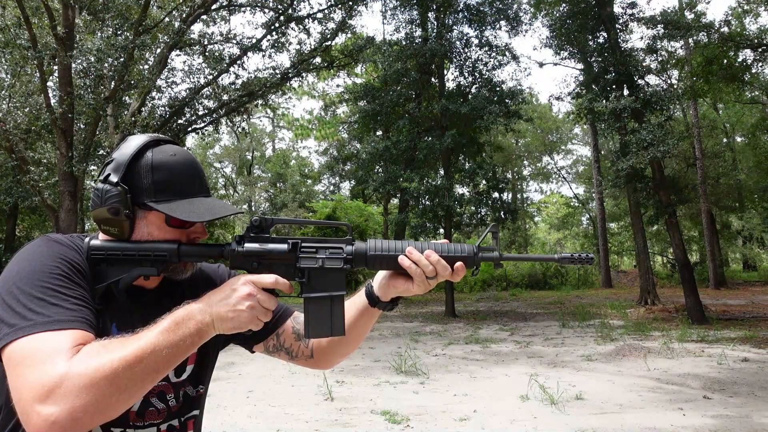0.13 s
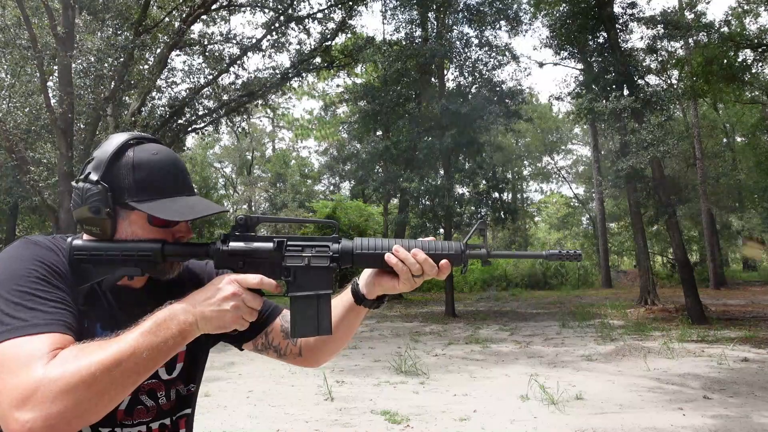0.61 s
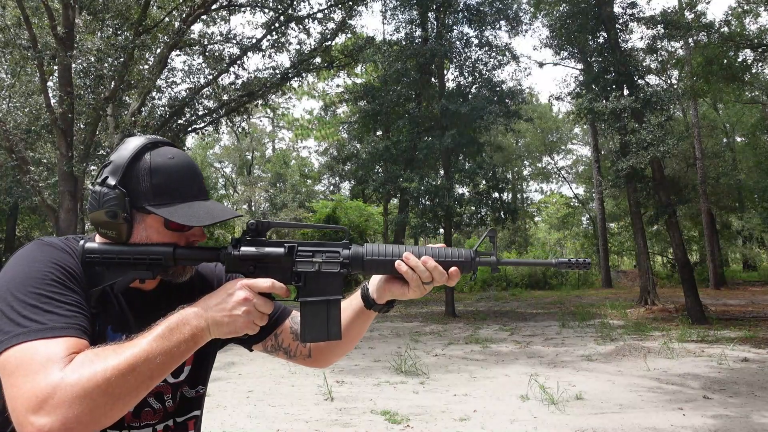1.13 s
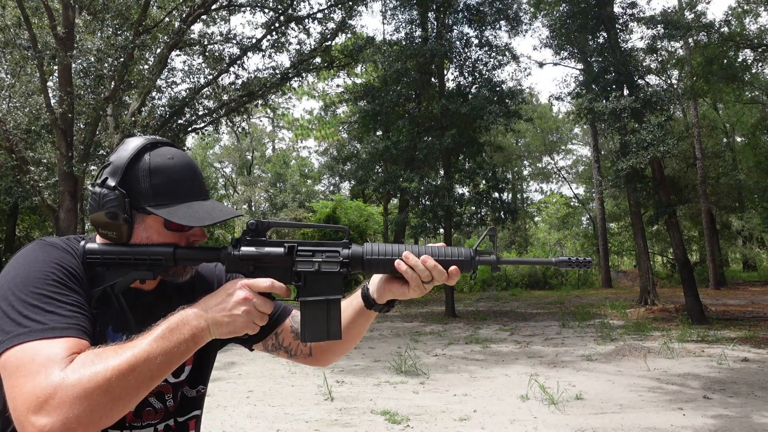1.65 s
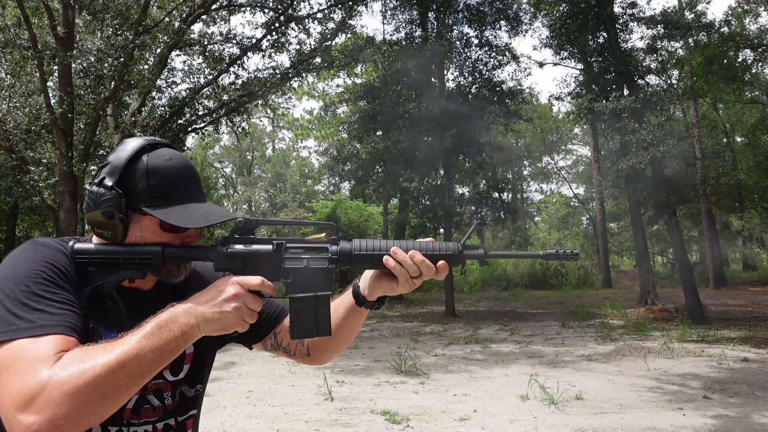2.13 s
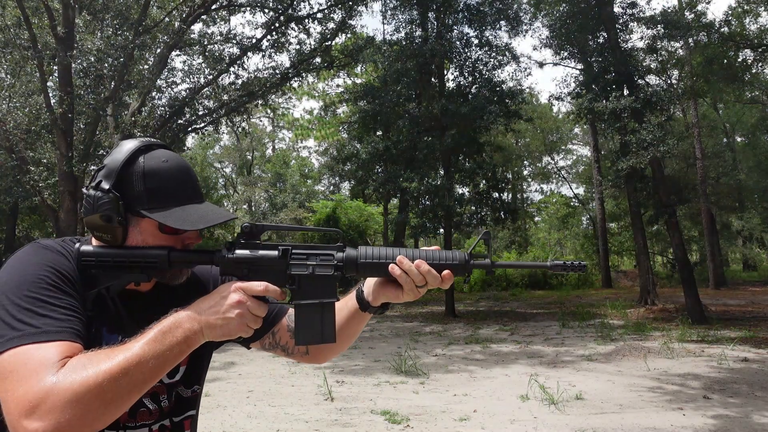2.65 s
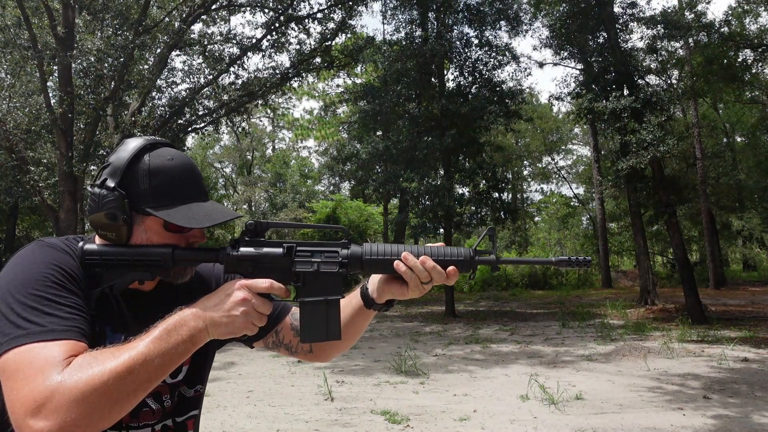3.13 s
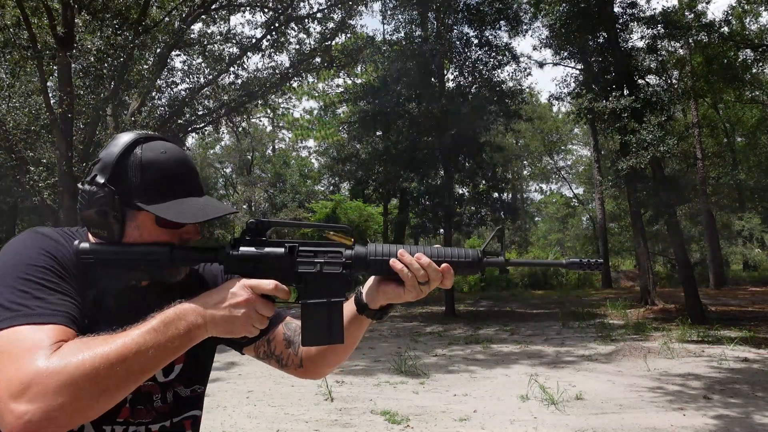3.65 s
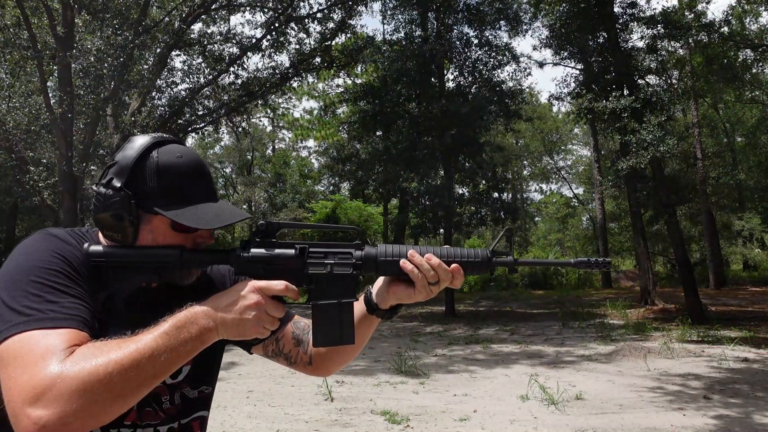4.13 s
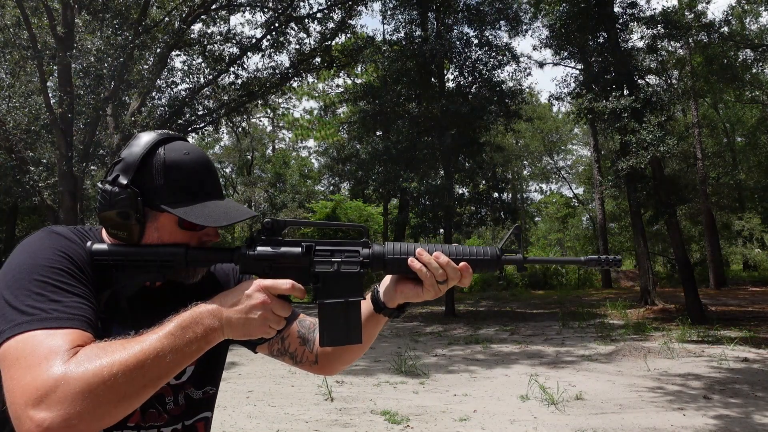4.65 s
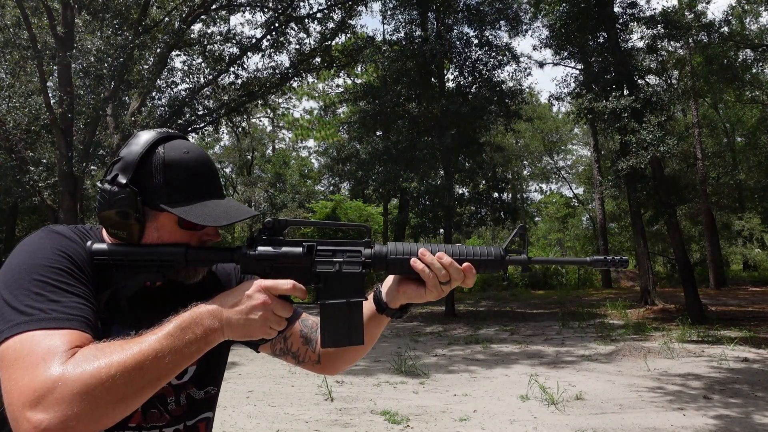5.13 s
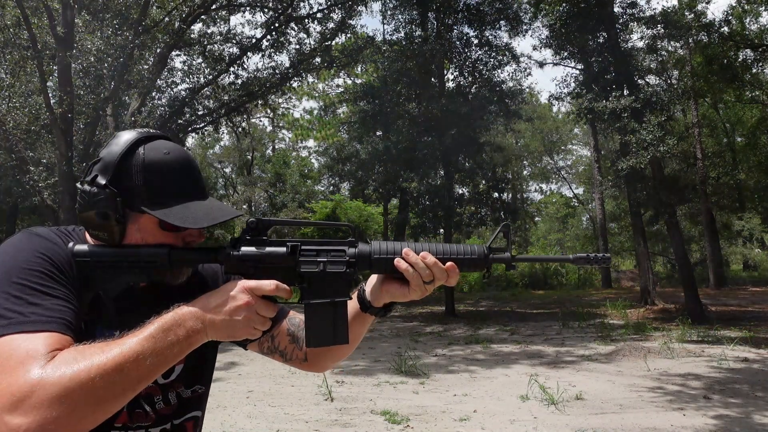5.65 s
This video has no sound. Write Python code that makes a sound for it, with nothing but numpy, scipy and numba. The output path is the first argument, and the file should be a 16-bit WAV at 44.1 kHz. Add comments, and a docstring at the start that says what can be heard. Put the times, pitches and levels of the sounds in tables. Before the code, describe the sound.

A quiet wooded clearing opens with soft air and a thin, high cicada hiss, its lower band sinking at the start. At about 0.4 s a close rifle fires: a tiny mechanical click, then a hard, overloaded crack and thump with quick slaps from nearby trunks. Under a tenth of a second later a steel plate clangs, bright and inharmonic, wavering as it swings. A dense forest roar, held level by limiting, loses treble and fades. A second shot and clang follow at 2.1 s. At 3.4 s the tail and most of the insects cut off abruptly; the third shot hits at 3.5 s. Around 4.24 s a spent case makes a very faint, high double tick. From 4.5 s a nearer cicada's rapid, even buzz swells as the chorus returns. The fourth shot lands at 5.4 s, its ring and roar still sounding at the end, near 5.8 s.

```python
"""In a wood clearing, a rifle fires four times close to a microphone; each bullet rings a steel plate.
Short noise bursts make the blast, and dying noise makes the long roar from the trees, treble fading first.
Dying sine waves make the plate; throbbing noise and a click train make the cicadas, over soft air noise.
A limiter holds the roar at one level until it has died down enough."""
import sys
import numpy as np
from scipy import signal
from scipy.io import wavfile
from scipy.ndimage import uniform_filter1d
from numba import njit

SR = 44100
rng = np.random.default_rng(int(sys.argv[2]) if len(sys.argv) > 2 else 0)


def boost(x):
    """Linear amplitude factor 10**(x/20) for a level x in decibels (scalar or array-like)."""
    u = np.asarray(x, float) / 20
    return 10 ** u


def digitize_waveform(pressure):
    """Quantize a signal to 16-bit integers and store it at the path in sys.argv[1].

    Rows of a 2-D input are taken as channels; values are limited to [-1, 1].
    """
    field = np.atleast_2d(pressure).T
    bounded = np.clip(field, -1, 1)
    quanta = np.round(bounded * 32767).astype(np.int16)
    wavfile.write(sys.argv[1], SR, quanta)


N = 254898  # length in samples

# The four shots. Each row: muzzle blast in seconds, level of the blast in dB, level of the echoes in dB.
SHOTS = [(.4265, 9.5, 0.24), (2.137, 9.5, -0.5), (3.517, 10, -0.5), (5.392, 8, -1)]
# The sound of earlier shots breaks off at this time.
CUT_S = 3.4095
# One shot as noise bursts, in row order: hammer, bullet start, gas crack, muzzle blast, its low body, ground
# echo, echo off the shooter and nearest ground, deep thud, low push, deep thud thrown back, two low slaps from
# the near trunks, sharp edge of that slap, the bullet bursting on the plate, a last low slap. Each row: start
# in ms from the blast, level in dB before the shot's own, time to die to 1/e in ms, centre in Hz, width in Hz.
BURSTS = [(-15, -37, 3.9, 1400, 9000), (-4.5, -21, 0.99, 5000, 8000), (-4, -12, 2, 5100, 12000),
          (0.44, 22, 2, 6100, 11600), (1.5, 12.5, 12, 760, 1560), (5, 18, 5.2, 3500, 19000),
          (7.5, 8, 3.7, 1200, 3500), (-5.5, -15, 7.2, 28, 43), (14, 16, 1.4, 157, 740),
          (54, -12, 21, 39, 56), (58, 7.5, 4.4, 490, 540), (65, 9.5, 9.9, 490, 480),
          (65.5, 12, 1.8, 2500, 2600), (74, 7, 0.97, 2100, 9900), (92, 5, 16.5, 630, 1700)]
# Echoes from the trees. Each row: pitch in Hz, starting level in dB before WOOD_DB, time to fall 60 dB in s.
WOOD_ECHOES = [(25, -112, 1), (60, -35, 6.9), (120, -5.5, 3.24), (271, 5.5, 1.96), (690, 8.5, 2.57),
               (1310, 3.5, 2.54), (2730, 1.5, 2.014), (4860, 2, 1.513), (7760, 3.5, 1.196),
               (10600, -3.5, 0.98), (14200, -1.5, 0.62), (16200, -16, 0.17)]
WOOD_DB, WOOD_RISE_S = 13, 0.014
# Rumble from the far forest. Each row: pitch in Hz, starting level in dB before FAR_DB, time to fall 60 dB in s.
FAR_RUMBLE = [(30, -33, 5.8), (120, -5.5, 5), (493, 4.5, 5.75), (1190, -0.5, 5.7), (2680, -8, 4.12),
              (8300, -50, 6.9)]
FAR_DB, FAR_RISE_S = 2.5, 0.46
# Ways the steel plate vibrates (modes). Each entry: pitch in Hz.
PLATE_HZ = [228, 668, 932, 1459, 1787, 1846, 2734, 2852, 3382, 3838, 4420, 4741, 4904, 5436, 5512, 6013,
            6481, 6740, 6880, 7407, 7590, 7917, 8196, 8457, 8710, 8952, 9400, 9593, 10930, 11838]
# The same modes in order. Each row: time to fall 60 dB in seconds, level in dB when struck on a belly
# (before PLATE_DB), place of the first hit between two bellies from 0 to 1, direction of its waves in degrees.
PLATE_MODES = [(5.45, -11, 0.7, 155), (2.2, 3, 0.27, -14), (2.38, -6.5, 0.36, 114), (1.92, -0.5, 0.53, 58),
               (2.17, 0.5, 0.38, 122), (2.5, -5, 0.74, 142), (2.1, -5, 0.05, -1), (2.1, -4.5, 0.39, 0),
               (1.91, 2.5, 0.7, 0), (1.76, -4, 0.27, 67), (1.62, -1, 0.12, 93), (1.36, -1, 0.88, 30),
               (1.58, -3, 0.51, 90), (1.5, 4, 0.42, 154), (1.53, 0, 0.51, 60), (1.4, -3, 0.9, 116),
               (1.42, -2, 0.72, 27), (1.33, 4, 0.45, 152.5), (0.96, -3, 0.97, 0), (0.4, -12.5, 0.09, 30),
               (1.1, -4, 0.97, 82), (1.21, 1.5, 0.2, 38), (1.15, 0, 0.6, 33), (1.26, -1.5, 0, 76),
               (1, -8, 0.05, 78), (1.14, -3, 0.47, 62), (1.18, 1, 0.72, 154.5), (0.62, -2, 0.39, 60),
               (1.03, -7.5, 0.66, 61), (0.94, -5.5, 0.07, 91)]
PLATE_DB = -0.5
BEND_CM = 30  # length of a bending wave in the steel at 1 kHz
# One hit for each shot. Each row: flight to the plate and sound back in seconds, cm right of the first hit's
# reference point, cm up from it, pace of the swing (1 = usual).
HITS = [(.08, 0.5, 0, 0.96), (.077, 9, 6.5, 1.02), (.075, 6.5, -3, 1.15), (.077, 5, -2, 0.97)]
# The swinging plate turns each louder mode's beam past the microphone. Each key is a mode in Hz; its row:
# seconds after the hit, lift in dB, half width in seconds (both times at the usual pace).
BEAMS = {"228": (0.98, 6.3, 0.38), "668": (0.3, 7.5, 0.27), "932": (0.69, 8.2, 0.29),
         "1459": (.3, 6.7, 0.51), "1787": (0.049, 11.5, 0.081), "1846": (0.11, 9.9, 0.085),
         "2734": (0.05, 8.8, 0.037), "2852": (.1, 7, 0.071), "3382": (0.095, 8, 0.17),
         "4420": (0.35, 9.4, 0.058), "4741": (.09, 5.7, .1), "5436": (0.37, 9, 0.18), "6481": (.2, 4.3, .1),
         "6740": (0.46, 7.2, 0.15), "7917": (0.26, 5.5, .1), "8196": (0.21, 8.9, 0.04),
         "9400": (0.34, 2.5, 0.096)}
SWING_S, SWING_KEEPS = 0.564, 0.15  # the beam returns after each swing, with this share of its dB
# The plate's crowd of weak upper modes. Each row: pitch in Hz, usual level in dB, time to fall 60 dB in seconds.
SHIMMER = [(5800, -8, 1.06), (8900, -13.5, 1.2), (11700, -18.5, 1.01), (15700, -19, 0.65)]
# A spent case lands and bounces. Each row: start in seconds, starting level in dB.
CASE_TICKS = [(4.2412, -24), (4.2442, -31)]
# The cicada chorus. Each row: time in seconds, low band in dB, high band in dB, centre of the high band in Hz.
CICADAS = [(0, -33, -34.5, 10100), (.12, -41.5, -37.5, 9700), (.4, -41.5, -37.5, 9450),
           (1.3, -49, -38, 9700), (1.64, -47, -40.5, 9700), (1.72, -42.5, -37, 9950),
           (2.1, -38.5, -33.5, 9960), (3.409, -41.5, -35, 9800), (3.41, -62, -77, 9600),
           (3.5, -51, -64, 9600), (4.5, -50, -45, 9500), (4.999, -44, -42.5, 9650), (5.78, -37, -46, 9600)]
# Three strips side by side make the high band broad and flat-topped. Each entry: shift from its centre in Hz.
SPREAD_HZ = [-560, 0, 560]
LOW_HZ, TOP_HZ, TOP_DB = 5120, 13700, -14.5  # the faint top band follows the high one's level
SINK_HZ, SINK_S = 400, 0.052  # the low band starts this much higher and sinks to its pitch
# One near cicada. Each row: time in seconds, clicks per second, level in dB before its body colours it.
SINGER = [(4.5, 170.4, -54), (4.65, 170.1, -50), (4.8, 169.3, -47), (4.95, 168.9, -45), (5.1, 168.9, -43),
          (5.25, 168.8, -43), (5.4, 168.9, -44)]
# How its body colours the clicks. Each row: pitch in Hz, gain in dB.
SINGER_BODY = [(4500, -6.5), (4900, -16), (5066, 4.5), (5250, -19), (5450, -11), (6100, -7.5), (6700, -15),
               (8000, -29), (9000, -14), (10480, -4.5), (10650, -29), (13300, -30), (14000, -18),
               (15000, -24)]
# Colour of the still air. Each row: pitch in Hz, relative level in dB.
AIR_COLOUR = [(25, -39), (60, 11), (150, 3.5), (400, 2.5), (1000, -3), (2500, -18.5), (7000, -21),
              (12000, -25), (17000, -22)]
# Loudness of the still air. Each row: time in seconds, level in dB.
AIR_LEVEL = [(0, -42.5), (3.409, -40), (3.41, -40.5), (5.78, -40)]


def evened(x):
    """Scales a sound so that its average power is 1."""
    return x / np.sqrt(np.mean(x ** 2) + 1e-20)


def add(mix, s, sound):
    """Mixes a sound in at s seconds."""
    part = mix[round(s * SR):][:len(sound)]
    part += sound[:len(part)]


def resonate(x, hz, width):
    """Keeps what lies near hz: shifts it down to zero, smooths it twice, and shifts it back."""
    turn = np.exp(2j * np.pi * np.cumsum(hz * np.ones(len(x))) / SR)
    r = np.exp(-np.pi * width / SR)
    low = signal.lfilter([(1 - r) ** 2], [1, -2 * r, r * r], x / turn)
    return 2 * (turn * low).real


def shape(x, table):
    """Colours x by rows (Hz, dB, seconds to fall 60 dB), each band dying at its own speed."""
    hz, t, z = signal.stft(x, SR, nperseg=1024, noverlap=768)
    row_hz, db, t60 = np.transpose(table)
    db, t60 = (np.interp(np.log(hz + 1), np.log(row_hz), column)[:, None] for column in (db, t60))
    z = z * boost(db - 60 * t / np.maximum(t60, .1))
    return signal.istft(z, SR, nperseg=1024, noverlap=768)[1][:len(x)]


def blast():
    """Hammer, crack, muzzle blast and first slaps as dying noise, starting 20 ms ahead of the blast."""
    out, t = np.zeros(SR // 5), np.arange(SR // 10) / SR
    for ms, db, decay_ms, hz, width in BURSTS:
        noise = evened(resonate(rng.standard_normal(len(t)), hz, width))
        envelope = np.exp(-1000 * t / decay_ms) * np.minimum(t / 0.00017, 1)
        add(out, (ms + 20) / 1000, boost(db) * noise * envelope)
    return out


def echoes(t):
    """Single trunks send sharp echoes back over a dense bed; the far forest answers late and dull."""
    # about 1200 single echoes a second, of chance strength
    strength_db = 2.7 * np.minimum(rng.exponential(1, len(t)), 5)
    trunks = (rng.random(len(t)) < 1200 / SR) * boost(strength_db)
    near = evened(.5 * evened(trunks - trunks.mean()) + rng.standard_normal(len(t)))
    # trees stand in groups, so the level drifts
    drift = uniform_filter1d(uniform_filter1d(rng.standard_normal(len(t)), 1500), 1500)
    stands_db = 1.5 * evened(drift)
    near = boost(WOOD_DB + stands_db) * shape(-near, WOOD_ECHOES) * (1 - np.exp(-t / WOOD_RISE_S))
    far = shape(rng.standard_normal(len(t)), FAR_RUMBLE) * (1 - np.exp(-t / FAR_RISE_S))
    return near + boost(FAR_DB) * far


def plate(t, right_cm, up_cm, pace):
    """Dying modes, strong if hit on a belly; they swell with the swing and waver as their echoes interfere."""
    out, slow = np.zeros(len(t)), t[::64]  # levels change slowly, so a coarse clock is enough
    for hz, (t60, db, place, deg) in zip(PLATE_HZ, PLATE_MODES):
        rate, phase = rng.uniform(2.48, 14.5, (4, 1)), 2 * np.pi * rng.random((5, 1))
        off_cm = right_cm * np.cos(np.radians(deg)) + up_cm * np.sin(np.radians(deg))
        # waves get shorter by the root of the pitch
        off_turn = 2 * np.pi * off_cm / BEND_CM * np.sqrt(hz / 1000)
        struck = np.hypot(np.cos(np.pi * place + off_turn), .1)
        waver_db = min(hz / 1500, 1.6) * np.sin(2 * np.pi * rate * slow + phase[:4]).sum(0)
        beam_s, lift_db, width_s = BEAMS.get(str(hz), (0, 0, 1))
        beam_db = sum(lift_db * SWING_KEEPS ** k
                      * np.exp(-((pace * slow - beam_s - k * SWING_S) / width_s) ** 4) for k in range(3))
        level = struck * boost(db - 60 * slow / t60 + waver_db + beam_db)
        out += np.interp(t, slow, level) * np.sin(2 * np.pi * hz * t + phase[4])
    return boost(PLATE_DB) * out * (1 - np.exp(-t / .008))


def shimmer(t):
    """Many thin plate modes of chance pitch and strength, each flickering as its echoes interfere."""
    row_hz, db, t60 = np.transpose(SHIMMER)
    slow, out = t[::64], np.zeros(len(t))
    for place, size, *chance in rng.random((70, 9)):
        hz = 5800 + place * 9900
        rate = 2.2 + 8 * np.array(chance[:3])[:, None]
        phase = 2 * np.pi * np.array(chance[3:])[:, None]
        flicker_db = 3.1 * np.sin(2 * np.pi * rate * slow + phase[:3]).sum(0)
        start_db = np.interp(hz, row_hz, db) + 9 * (size - .5)
        level_db = start_db - 60 * slow / np.interp(hz, row_hz, t60) + flicker_db
        out += np.interp(t, slow, boost(level_db)) * np.sin(2 * np.pi * hz * t + phase[3])
    return out * (1 - np.exp(-t / .02))


def case_tick(t):
    """The spent case touches down: a very short dying burst of high noise."""
    return evened(resonate(rng.standard_normal(400), 13500, 5000)) * np.exp(-t[:400] / 0.0013)


def cicadas(t):
    """A chorus of uneven clicking, as gently throbbing noise in three broad bands."""
    s, *columns = np.transpose(CICADAS)
    low_db, high_db, high_hz = (np.interp(t, s, column) for column in columns)
    throb_hz = 160 + 300 * uniform_filter1d(rng.standard_normal(N), 400)
    throb = 1 + 0.1 * np.cos(2 * np.pi * np.cumsum(throb_hz) / SR)
    low_hz = LOW_HZ + SINK_HZ * np.exp(-t / SINK_S)  # sinks as an opening swell dies
    low = evened(resonate(throb * rng.standard_normal(N), low_hz, 810))
    high = evened(sum(resonate(throb * rng.standard_normal(N), high_hz + side, 740) for side in SPREAD_HZ))
    top = evened(resonate(throb * rng.standard_normal(N), TOP_HZ, 2600))
    return boost(low_db) * low + boost(high_db) * (high + boost(TOP_DB) * top)


def singer():
    """An even click train as a sum of harmonics, coloured by the insect's hollow body; also gives its start."""
    s, hz, db = np.transpose(SINGER)
    t = np.arange(s[0], s[-1], 1 / SR)
    jitter = 1 + .005 * uniform_filter1d(rng.standard_normal(len(t)), 3000)
    click_hz = np.interp(t, s, hz) * jitter
    turns = np.cumsum(click_hz) / SR
    body_hz, body_db = np.transpose(SINGER_BODY)
    lag = 17 / 30  # the second drum clicks this part of a cycle after the first
    song = np.zeros(len(t))
    for k in range(26, 89):
        first_drum = .55 * np.cos(2 * np.pi * k * turns)
        second_drum = 0.54 * np.cos(2 * np.pi * k * (turns - lag))
        song += boost(np.interp(k * click_hz.mean(), body_hz, body_db)) * (first_drum + second_drum)
    return s[0], np.sqrt(2) * boost(np.interp(t, s, db)) * song * signal.windows.tukey(len(t), .04)


def still_air(t):
    """The quiet of the clearing: coloured noise that does not die away."""
    colour = [(hz, db, np.inf) for hz, db in AIR_COLOUR]
    return boost(np.interp(t, *np.transpose(AIR_LEVEL))) * evened(shape(rng.standard_normal(N), colour))


def scene():
    """Shots over insects and air, alike in both channels."""
    t = np.arange(N) / SR
    mix = still_air(t) + cicadas(t)
    add(mix, *singer())
    after = t[:3 * SR]
    for (s, blast_db, echo_db), (flight, *blow) in zip(SHOTS, HITS):
        shot = np.zeros(N)
        add(shot, s - .02, boost(blast_db) * blast())
        add(shot, s, boost(echo_db) * echoes(after))
        add(shot, s + flight, plate(after, *blow))
        add(shot, s + flight, shimmer(after[:3 * SR // 2]))
        mix += shot * ((t < CUT_S) | (s > CUT_S))
    for s, db in CASE_TICKS:
        add(mix, s, boost(db) * case_tick(t))
    return np.array([mix, mix])


@njit
def follow(size, rise, fall):
    """Follows the peaks of a sound, quick up and slow down."""
    out, held = np.empty_like(size), 0.
    for i in range(len(size)):
        held += (rise if size[i] > held else fall) * (size[i] - held)
        out[i] = held
    return out


def low_pass(x):
    """Removes everything above the highest recorded frequency."""
    return signal.sosfilt(signal.butter(12, 15800, fs=SR, output="sos"), x)


def record(dry):
    """The limiter is too slow for the blast, which overloads; then it rides the roar."""
    ceiling = np.where(dry > 0, boost(29.5), boost(18.5))  # the capsule overloads sooner on one side
    dry = ceiling * np.tanh(dry / ceiling)
    held = follow(abs(dry[0]), 1 / (0.0039 * SR), 1 / (0.019 * SR))  # rises in 3.9 ms, falls in 19 ms
    over = np.maximum(held / boost(-6.0), 1)  # how far the peaks pass the limit
    dry = signal.lfilter(*signal.butter(2, 75, "high", fs=SR), dry)  # the microphone drops the deepest bass
    limited = dry / uniform_filter1d(over, 40) ** 1.001
    mix = boost(-1.5) * np.tanh(limited / boost(1.0))  # soft overload
    return low_pass(mix)


dry = scene()
out = record(dry)
digitize_waveform(out)
```